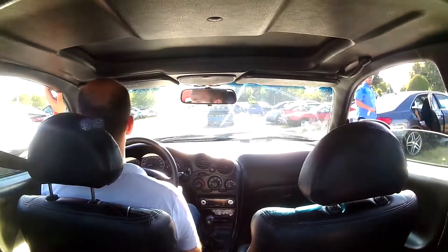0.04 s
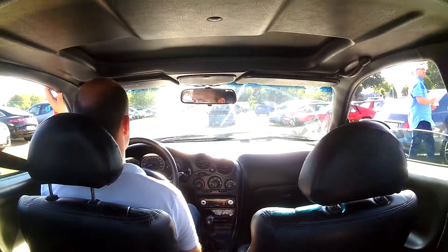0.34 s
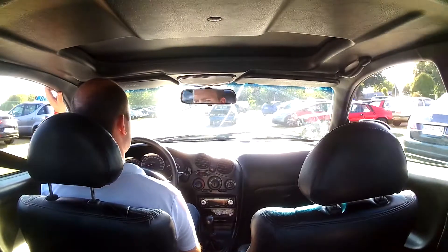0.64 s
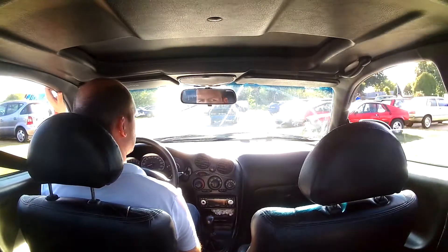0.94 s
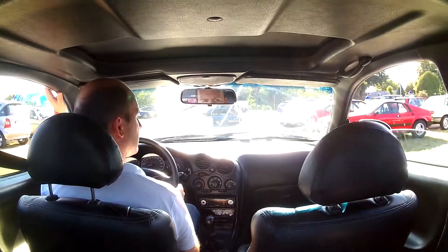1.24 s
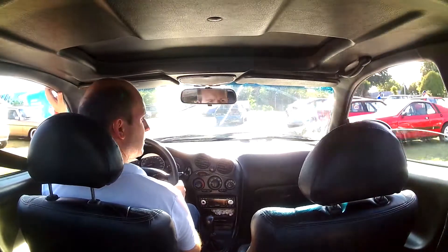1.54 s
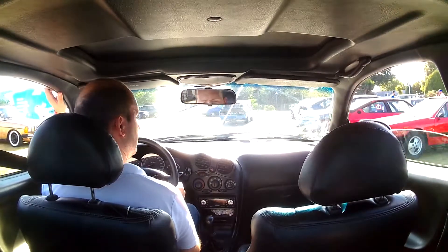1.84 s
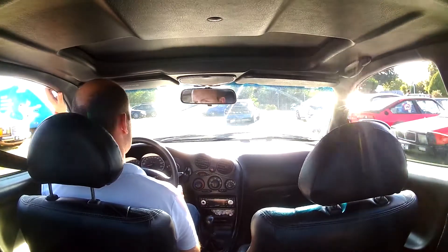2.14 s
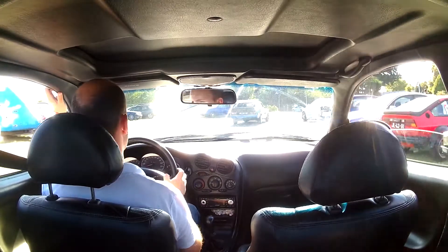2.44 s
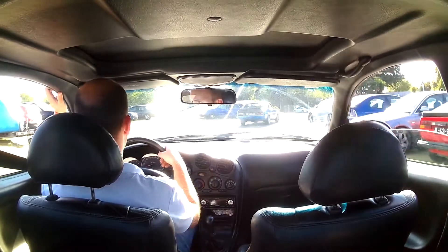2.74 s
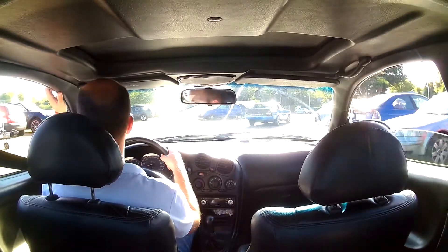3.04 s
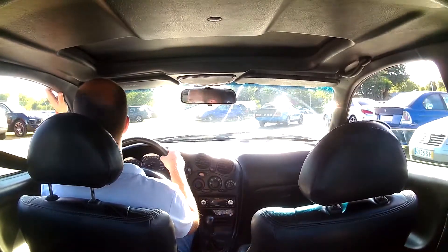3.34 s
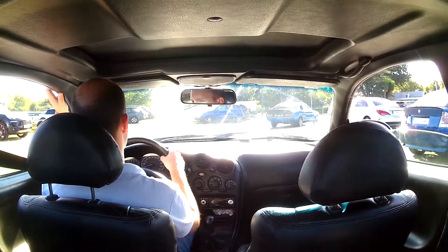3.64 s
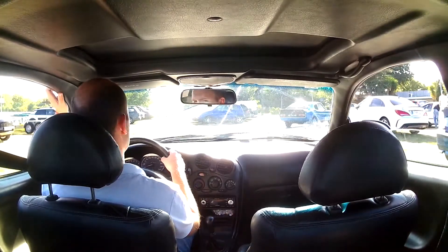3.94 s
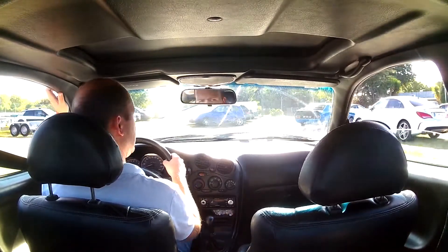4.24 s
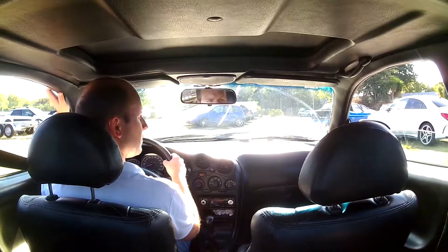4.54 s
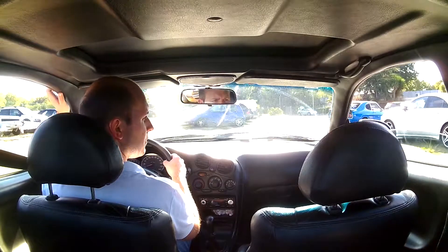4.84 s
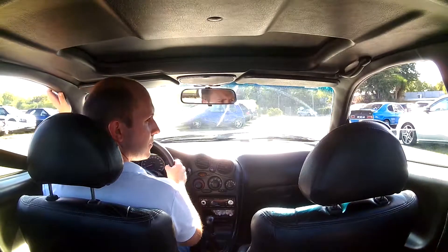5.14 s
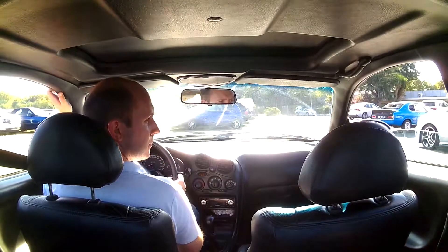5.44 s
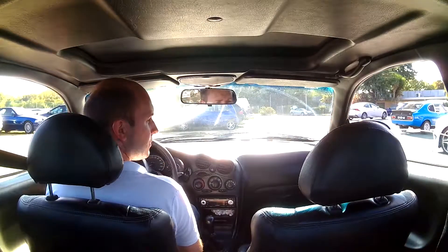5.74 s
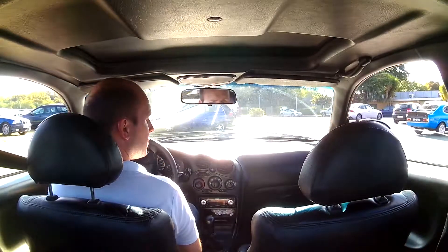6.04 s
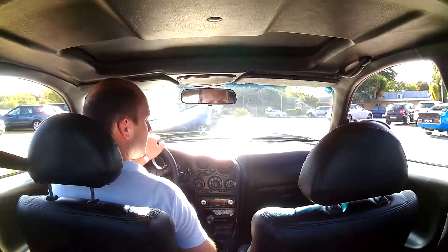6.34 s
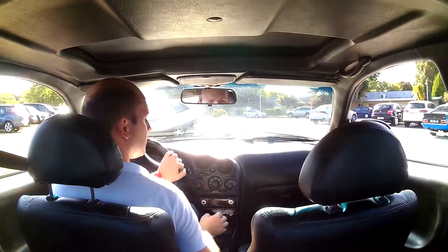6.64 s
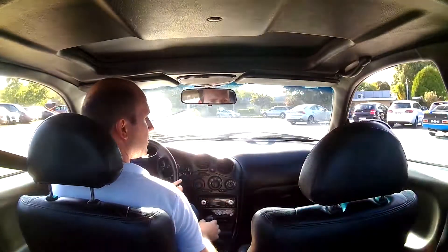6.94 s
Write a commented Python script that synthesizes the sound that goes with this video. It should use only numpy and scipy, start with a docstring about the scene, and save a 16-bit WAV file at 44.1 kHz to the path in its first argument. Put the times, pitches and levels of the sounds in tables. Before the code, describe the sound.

A small car rolls slowly through a car park, heard from the back seat. From the start the cabin booms in deep, uneven throbs over a low engine hum, road rumble and soft tyre noise. Bumps in the ground swell the boom several times between 0.4 and 1.2 seconds. Faint, brief rushes pass at about 1.2, 1.8 and 3 seconds. The strongest cluster of low surges comes between about 2.9 and 3.6 seconds, with more near 3.9 and 4.4. After 4 seconds the engine sinks to idle, and a deeper drone rises briefly around 5.2 seconds and again near 7. Towards the end the boom is weaker and slightly higher, with a few softer swells. Throughout, a camera's electronics add a thin, very high whine that cuts out about three times a second, along with a faint steady buzz and hiss.

```python
"""A small car rolls slowly through a car park, heard from the back seat.
From the start the cabin's air resonance booms in uneven throbs over engine hum, road rumble and tyres,
while a camera's electronics add a thin, stuttering whine and a steady buzz. Brief rushes pass from
about 1 s, and jolts from the ground swell the boom, in a strong cluster near 3.3 s. After 4 s the
engine sinks to idle, and towards the end the boom is weaker and slightly higher."""
import sys
import numpy as np
from scipy import signal
from scipy.fft import rfft, irfft
from scipy.io import wavfile
from scipy.ndimage import uniform_filter1d

SR = 44100
rng = np.random.default_rng(int(sys.argv[2]) if len(sys.argv) > 2 else 0)


def dump(signal):
    """Clip the signal to [-1, 1] and save it as 16-bit WAV at the path in sys.argv[1]."""
    limited = np.clip(np.atleast_2d(signal).T, -1, 1)
    pcm = np.round(limited * 32767).astype(np.int16)
    wavfile.write(sys.argv[1], SR, pcm)


N = 308259
TIME = np.arange(N) / SR


# main air mode between jolts: t/s, f/Hz, amplitude level before shaking/dB
CABIN_MODE = [(0, 88.5, -25), (.7, 88.62, -27.5), (.97, 89, -41), (1.25, 89, -26), (1.36, 89.12, -33.5),
              (1.52, 88.43, -26), (2.3, 87.7, -27.5), (2.65, 87.94, -23.5), (2.83, 88.9, -29),
              (3.4, 88.6, -30.5), (4.1, 88.5, -26), (4.35, 90, -30.5), (5.3, 93.8, -34.5), (5.7, 93, -40.5),
              (6.5, 92.3, -35), (7, 92.6, -37)]
# jolts from the ground: t/s, peak level/dB, duration at half height/s
GROUND_JOLTS = [(.404, -22.5, 0.049), (.598, -23.5, 0.0567), (0.806, -18.5, 0.062), (1.045, -21.5, 0.051),
                (1.187, -20, 0.025), (2.535, -22.5, 0.13), (2.941, -20, 0.087), (3.147, -18.5, 0.027),
                (3.312, -18.5, 0.034), (3.529, -19, 0.048), (3.926, -21, 0.1), (4.436, -20.5, 0.032),
                (5.292, -24.5, 0.044), (5.791, -24.5, 0.056), (6.231, -23, 0.18), (6.81, -25.5, 0.051)]

def cabin_boom(shake_depth=0.75, stray_hz=1.728):
    """Forced resonance: the cabin air throbs as the body shakes; a hard jolt takes over and swells it."""
    hz, db = curves(CABIN_MODE)
    amplitude = gain_of(db) * (1 + shake_depth * body_sway())
    for at, peak_db, duration in GROUND_JOLTS:
        swell = gaussian_pulse(at, duration)
        amplitude = amplitude * (1 - np.sqrt(swell)) + gain_of(peak_db) * swell
    return amplitude * np.sin(phase_of(hz + stray_hz * wander(15.25)))


def body_sway(low_hz=4.9, high_hz=11.2):
    """Random vibration: the body sways on its springs in a low band, bounded by -1 and 1."""
    hz = np.fft.rfftfreq(N, 1 / SR)
    band = (1 - np.exp(-(hz / low_hz) ** 2)) * np.exp(-(hz / high_hz) ** 2)
    return np.tanh(filtered_noise(band))


# rumble spectrum: f/Hz, relative density/dB
ROAD_SPECTRUM = [(10, -33.5), (21, -30.5), (30, -21), (46, -12.5), (60, -5.5), (69, -10), (77, 1.5),
                 (88, -4.5), (102, -0.5), (118, -9), (143, -12), (175, -21.5), (210, -30.5), (300, -55.5),
                 (600, -90)]
# rumble strength: t/s, level/dB
ROAD_LEVEL = [(0, -39.5), (2, -35.5), (3, -38), (3.5, -35.5), (4.2, -37.5), (5.5, -38), (6.3, -37.5),
              (7, -37)]

def road_rumble():
    """Structure-borne sound: dull noise is carried up through the suspension."""
    db, = curves(ROAD_LEVEL)
    return gain_of(db) * coloured_noise(ROAD_SPECTRUM)


# engine sinking to idle: t/s, firing rate f/Hz, level/dB
ENGINE_RUN = [(0, 73, -39.5), (1.5, 76.5, -40.5), (2.2, 72, -46), (3.7, 71, -46), (4.4, 65, -45),
              (4.8, 63, -51), (5.05, 53, -50), (5.3, 46, -46), (5.6, 43, -50), (6, 33, -51), (6.5, 47, -57),
              (7, 31, -52)]
# engine harmonics: multiple of the firing rate, relative level/dB
ENGINE_ORDERS = [(1, 8), (2, -1), (3, -22), (4, -28), (5, -35)]

def engine(unsteadiness=0.0111, roughness=0.13):
    """Harmonic series of the firing rate: uneven firing modulates its pitch and strength."""
    firing_hz, db = curves(ENGINE_RUN)
    phase = phase_of(firing_hz * (1 + unsteadiness * wander(6.66)))
    hum = np.zeros(N)
    for order, order_db in ENGINE_ORDERS:
        harmonic = np.sin(order * phase + 2 * np.pi * rng.random())
        hum += gain_of(order_db) * harmonic * (1 + roughness * wander(33))
    return gain_of(db) * unit_rms(hum)


# strength of the deep resonance: t/s, level/dB
DEEP_MODE_LEVEL = [(0, -67), (.8, -52), (1.2, -44), (1.9, -51), (2.4, -52), (2.8, -44), (3.2, -50),
                   (4, -52), (4.6, -45.5), (5.2, -37), (5.55, -63), (5.9, -44), (6.4, -51), (6.9, -36)]

def deep_drone(pitch_hz=60.5, stray_hz=1.514):
    """A lower normal mode of the body comes and goes under the boom."""
    db, = curves(DEEP_MODE_LEVEL)
    phase = phase_of(pitch_hz + stray_hz * wander(6.3))
    return gain_of(db) * unit_rms(np.sin(phase))


# rushes and hollow drones as the car rolls on:
# t/s, centre f/Hz, glide/(Hz/s), bandwidth/Hz, peak level/dB, duration at half height/s
NOISE_SWELLS = [(1.151, 486, 20, 25, -66.5, 0.9), (1.22, 1280, 0, 760, -59.5, 0.14),
                (1.23, 616, 0, 270, -62, 0.099), (1.25, 226, 0, 61, -53, 0.2),
                (1.7, 220, 3, 60, -52.5, 0.16), (1.76, 1290, 0, 600, -61.5, 0.18),
                (1.78, 684.9, 0, 190, -64, 0.19), (2.65, 620, -1, 170, -65, 0.19),
                (3.049, 594, -2, 140, -58, 0.099), (3.02, 1310, 2, 680, -65.5, 0.11),
                (3.46, 123.6, -100, 29, -39, 0.26), (5.36, 171.5, 190, 12.65, -53.5, 0.22)]

def swells():
    """Band-limited noise under Gaussian envelopes: the narrower the band, the clearer its pitch."""
    hz = np.fft.fftfreq(N, 1 / SR)
    white = np.fft.fft(rng.standard_normal(N))
    total = np.zeros(N)
    for at, centre_hz, glide, width_hz, db, duration in NOISE_SWELLS:
        band = np.fft.ifft(white / (1 + (2 * (hz - centre_hz) / width_hz) ** 4))
        chirp = np.exp(1j * np.pi * glide * (TIME - at) ** 2)  # slides the band in frequency
        total += gain_of(db) * gaussian_pulse(at, duration) * unit_rms((band * chirp).real)
    return total


# tyre noise: t/s, panel hum level/dB, outside hiss level before its lift/dB
TYRE_LEVELS = [(0, -58, -61), (.9, -57.5, -63.5), (1.4, -57, -62), (2, -57, -63.5), (2.3, -58.5, -64.5),
               (2.8, -58, -64), (3.4, -59, -64.5), (4.1, -60, -65), (5, -59.5, -65), (6, -60, -65.5),
               (7, -60.5, -64.5)]
# spectra of the hum and the hiss: f/Hz, relative density/dB
PANEL_SPECTRUM = [(90, -40), (160, -2.5), (220, -1), (290, -2.5), (380, -5.5), (480, -8), (620, -13.5),
                  (1000, -30), (2500, -80.5)]
TREAD_SPECTRUM = [(200, -35), (450, -.5), (660, 2.5), (800, 0.5), (980, -2), (1280, -0.5), (1650, -3.5),
                  (2000, -9), (3000, -15.5), (5000, -19.5), (9000, -51)]

def tyres(hiss_lift_db=0.5, grain_db=1.0):
    """Transmission by two paths: tread noise hums in the panels and hisses in from outside."""
    hum_db, hiss_db = curves(TYRE_LEVELS)
    flutter_db = grain_db * wander(66)  # the grain of the ground
    hum = gain_of(hum_db + flutter_db) * coloured_noise(PANEL_SPECTRUM)
    hiss = gain_of(hiss_db + hiss_lift_db + flutter_db) * coloured_noise(TREAD_SPECTRUM)
    return hum + hiss


# starts of the whine's dropouts, about three a second: t/s
WHINE_DROPOUTS = [.158, .5, .867, 1.168, 1.533, 1.934, 2.171, 2.524, 2.829, 3.109, 3.472, 3.708, 4.027,
                  4.376, 4.61, 4.943, 5.203, 5.531, 5.878, 6.314, 6.748]
# one deep sag of the whine: t/s, duration/s, fall in f/Hz
WHINE_DEEP_SAG = (2.355, 0.03, 480)

def supply_whine(pitch_hz=7915, jitter_hz=85, pictures_per_s=29.92, dropout_s=0.052, level_db=-57):
    """Frequency modulation: the camera's power supply sings, sagging under the load of each picture."""
    from_picture = time_from_beat(at=-.002, period=1 / pictures_per_s)
    load = (1 + 0.11 * wander(40)) * np.exp(-abs(from_picture / .0042) ** 3)
    long_sag_hz = 290 * (abs(time_from_beat(at=.463, period=.5033)) < .018)
    at, duration, fall_hz = WHINE_DEEP_SAG
    deep_sag_hz = fall_hz * (abs(TIME - at) < duration / 2)
    sag_hz = np.maximum(530 * load, long_sag_hz + deep_sag_hz)
    phase = phase_of(pitch_hz - sag_hz + jitter_hz * wander(400))
    octave_db = -13 + 3.5 * load
    tone = np.sin(phase) + gain_of(octave_db) * np.sin(2 * phase)
    shimmer = 1 + 0.11 * wander(230)
    silent = sum((TIME > start) & (TIME < start + dropout_s) for start in WHINE_DROPOUTS)
    gate = uniform_filter1d(1. - silent, size=40)  # softened edges
    return gain_of(level_db) * gate * unit_rms(tone * shimmer)


# faint steady tones above the buzz: f/Hz, rms level/dB
HIGH_TONES = [(13168, -90.5), (13259, -91.5)]

def electronic_buzz(carrier_hz=8886, flips_per_s=75.3, level_db=-74):
    """Phase reversal: a tone that keeps flipping its sign splits into sidebands, heard as a buzz."""
    polarity = np.sign(np.sin(np.pi * flips_per_s * TIME))
    buzz = polarity * np.sin(2 * np.pi * carrier_hz * TIME)
    tones = sum(gain_of(db) * np.sqrt(2) * np.cos(2 * np.pi * hz * TIME) for hz, db in HIGH_TONES)
    return gain_of(level_db) * unit_rms(buzz) + tones


# microphone hiss: f/Hz, relative density/dB
SELF_NOISE_SPECTRUM = [(100, -9), (2500, 4.5), (4200, 2.5), (6000, 0.5), (7000, 4.5), (8500, 5.5),
                       (9700, 2), (10500, -1), (12900, -2), (13400, 4), (14200, 5), (14700, 1.5),
                       (15700, -8.5)]

def microphone_hiss(level_db=-67):
    """Self-noise: the microphone adds a steady broadband floor."""
    return gain_of(level_db) * coloured_noise(SELF_NOISE_SPECTRUM)


def gain_of(db):
    """Amplitude ratio of a level in decibels."""
    return 10 ** (np.asarray(db) / 20)


def unit_rms(x):
    """Normalisation to rms 1."""
    return x / np.sqrt(np.mean(x ** 2) + 1e-20)


def curves(rows):
    """Linear interpolation of each column of a time table, at every sample."""
    times, *columns = np.transpose(rows)
    return [np.interp(TIME, times, column) for column in columns]


def gaussian_pulse(at, duration):
    """Gaussian envelope of peak 1, its duration taken at half height."""
    return .5 ** ((2 * (TIME - at) / duration) ** 2)


def time_from_beat(at, period):
    """Periodicity: signed seconds from the nearest repeat of an event."""
    return (((TIME - at) / period + .5) % 1 - .5) * period


def phase_of(hz):
    """Phase as the time integral of frequency."""
    return 2 * np.pi * np.cumsum(hz) / SR


def filtered_noise(response):
    """Linear filtering of white noise, scaled to rms 1."""
    return unit_rms(irfft(rfft(rng.standard_normal(N)) * response, N))


def coloured_noise(spectrum):
    """Spectral shaping: noise of rms 1 follows a table along log frequency."""
    hz, db = np.transpose(spectrum)
    log_hz = np.log(np.fft.rfftfreq(N, 1 / SR) + 1)
    return filtered_noise(gain_of(np.interp(log_hz, np.log(hz), db)))


def wander(rate_hz):
    """Low-pass random fluctuation of rms 1, with little above the given rate."""
    hz = np.fft.rfftfreq(N, 1 / SR)
    return filtered_noise(np.exp(-(hz / rate_hz) ** 2))


def scene():
    """Superposition: all sources add at one microphone behind the seats."""
    car = cabin_boom() + deep_drone() + engine() + road_rumble() + tyres() + swells()
    return (car + supply_whine() + electronic_buzz() + microphone_hiss())[None]


def record(dry):
    """Band limiting: a steep low-pass filter removes the highest treble."""
    low_pass = signal.firwin(1023, cutoff=15760, window=("kaiser", 9), fs=SR)
    return signal.oaconvolve(dry, low_pass[None], "same")


dry = scene()
out = record(dry)
dump(out)
```